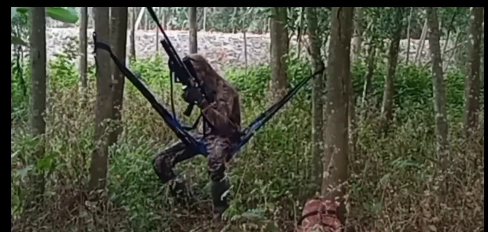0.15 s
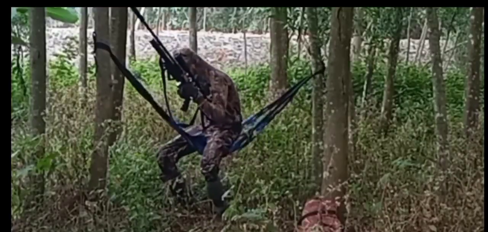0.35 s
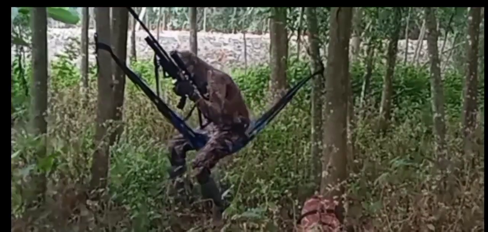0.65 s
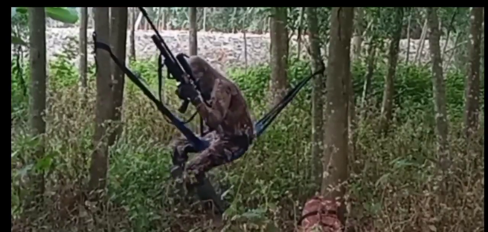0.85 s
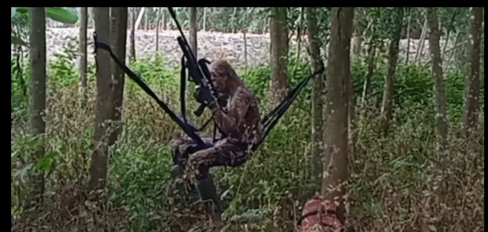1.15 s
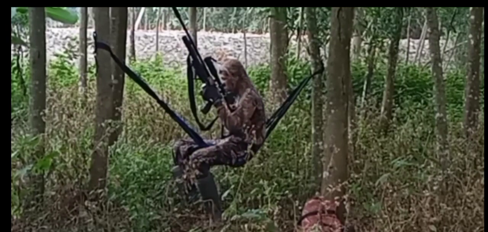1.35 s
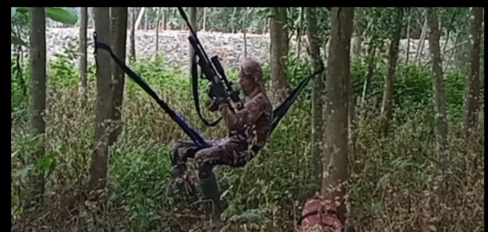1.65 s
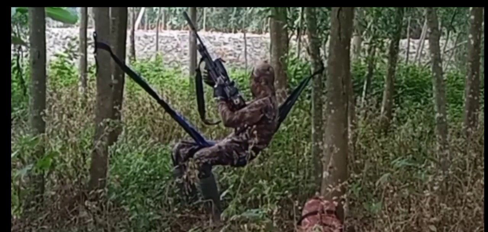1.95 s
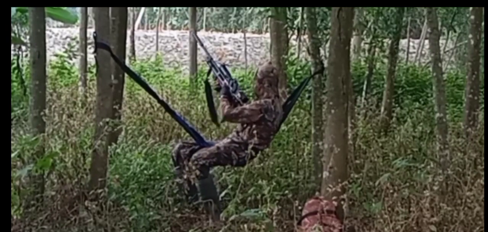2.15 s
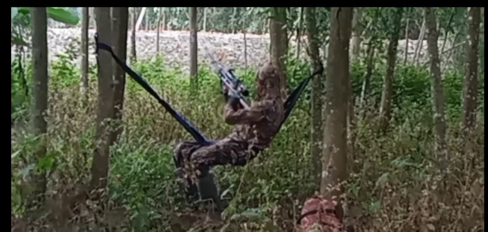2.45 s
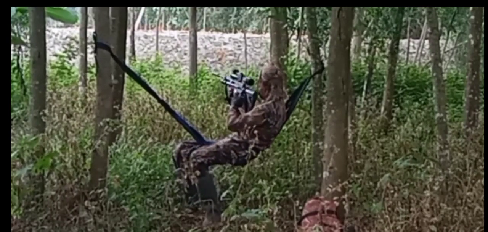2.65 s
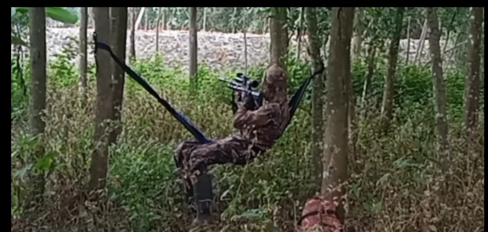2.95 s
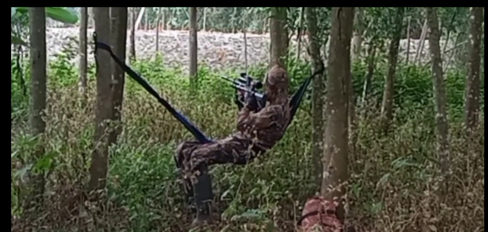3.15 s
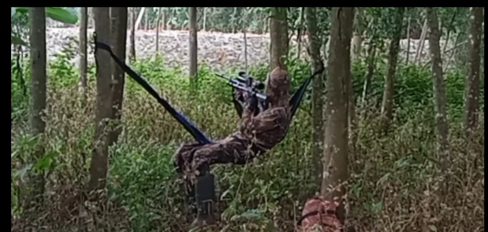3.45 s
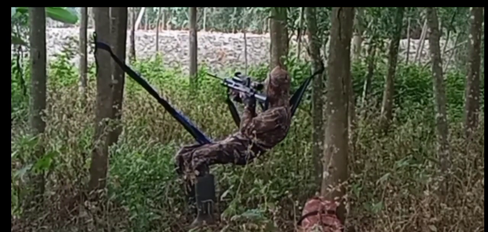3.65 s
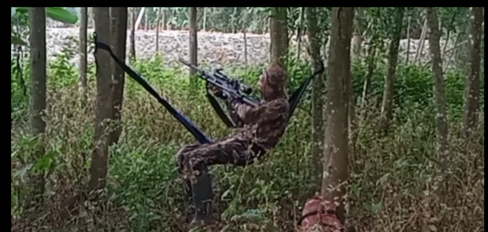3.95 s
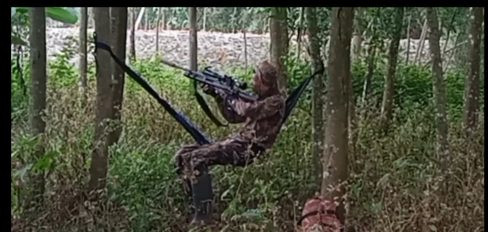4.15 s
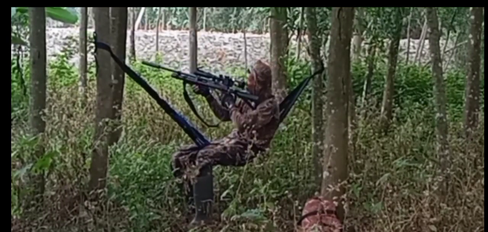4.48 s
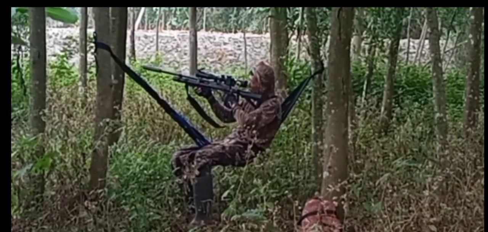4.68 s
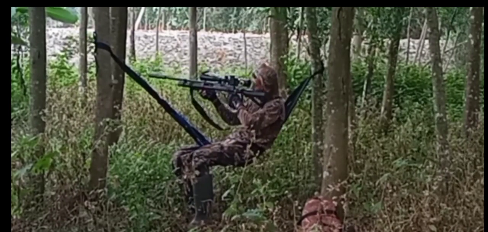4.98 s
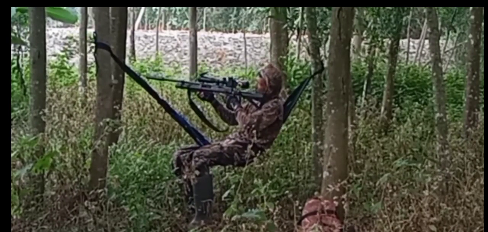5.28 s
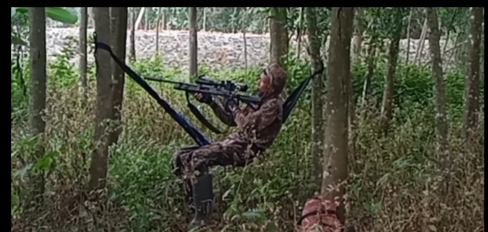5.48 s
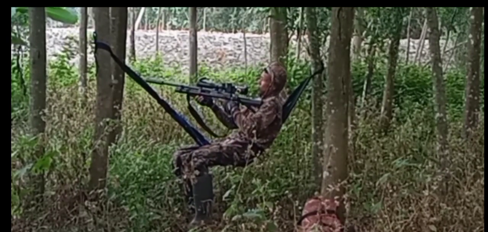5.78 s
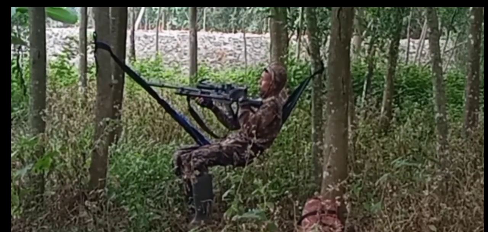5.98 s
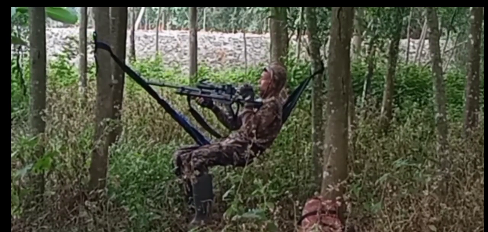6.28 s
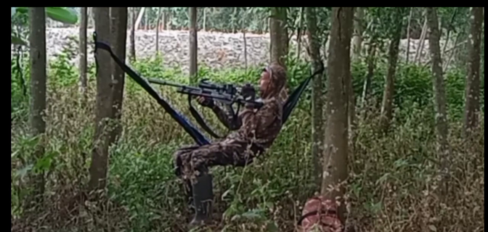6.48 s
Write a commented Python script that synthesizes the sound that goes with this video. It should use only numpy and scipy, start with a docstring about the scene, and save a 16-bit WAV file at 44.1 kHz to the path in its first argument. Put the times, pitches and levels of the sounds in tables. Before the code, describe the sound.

Low trills of quick hoots, each about half a second long, come evenly from a frog-like animal near the microphone and are the loudest sound. Behind them crickets and other insects keep up a high forest drone, with one nearer cricket chirping in runs to the left. Two sharp, falling bird calls ring out a few seconds apart, with faint distant whistles, one slight cloth rustle and soft puffs of air.

```python
"""A low, rolling trill about once a second: a frog-like animal hoots close by in a humid wood.
To the left a cricket scrapes falling chirps with its wings, over a steady chorus of other insects.
A small bird gives two thin, sharp calls, and far birds whistle, heard mostly as echo off the trees.
Air rumbles softly on the microphone, and cloth rustles once."""
import sys
import numpy as np
from scipy import signal
from scipy.fft import rfft, irfft
from scipy.io import wavfile

SR = 44100
rng = np.random.default_rng(int(sys.argv[2]) if len(sys.argv) > 2 else 0)


def wav_record(signal):
    """Record a signal, one row per channel, as 16-bit PCM in the file named by sys.argv[1]."""
    frames = np.transpose(np.atleast_2d(signal))
    bounded = np.clip(frames, -1, 1)
    # unit amplitude maps onto the largest positive 16-bit level
    quanta = np.round(bounded * 32767).astype(np.int16)
    wavfile.write(sys.argv[1], SR, quanta)


N = 291942
TIME = np.arange(N) / SR
FREQS = np.fft.rfftfreq(N, 1 / SR)
LIFT_S = .0052  # how long the push that starts a hoot lifts its pitch


def trill(ring_hz=473.55, arch_hz=13.8, push_s=.005, rasp_s=.0029, stutter_hz=462, mic_lag_s=.00082):
    """The frog-like animal, close by: trains of hoots, raspy where pushed hard, smooth for a stretch."""
    # one trill a row; the middle of its smooth stretch is timed from the first pulse:
    # first_pulse_s, last_pulse_s, level_db, rasp_re_pulse_db, smooth_middle_s, smooth_half_length_s
    trills = [(-.279, 0.154, -18.5, -21, .2, 0.063), (0.628, 1.108, -18.5, -22.5, 0.31, 0.048),
              (1.611, 2.048, -19, -19.5, .27, 0.19), (2.621, 3.057, -19, -18.5, 0.16, 0.035),
              (3.531, 4.01, -18.5, -22, 0.32, 0.046), (4.514, 4.951, -19.5, -20.5, 0.26, 0.18),
              (5.523, 5.96, -18.5, -18.5, 0.15, 0.024), (6.458, 6.897, -19, -21.5, 0.23, 0.083)]
    t = np.arange(-.03, .05, 1 / SR)
    tone, buzz = np.zeros(N), np.zeros(N)
    for first, last, db, rasp_db, smooth_at, smooth_for in trills:
        times = pulse_times(first, last)
        for s, chance in zip(times, rng.standard_normal((len(times), 4))):
            pitch_dev, phase_dev, rasp_dev, damping_dev = chance
            arch = np.sin(np.pi * (s - first) / (last - first)) - .5  # highest in mid-trill
            hz = (ring_hz + arch_hz * arch) * (1 + .012 * pitch_dev)
            if s == times[-1]:  # the spent last pulse
                smooth, gain = 1, amp(db - 2.5)
                swell, phase = hoot(t, hz, lift=.49, push_db=0, push_s=.0097, damped=.39)
            else:
                smooth, gain = np.exp(-((s - first - smooth_at) / smooth_for) ** 8), amp(db)
                early_damping = .24 * bell(s - first - .131, .043)
                damped = min(early_damping + .089 * damping_dev, .5)
                lift = .72 if s in (first, times[-2]) else 1  # opening and closing pushes are flatter
                push_db = .93 * (1 - smooth)
                swell, phase = hoot(t, hz, lift, push_db, push_s, damped)
            phase = phase + np.pi * phase_dev
            add(tone, s + t[0], gain * swell * np.sin(phase))
            # a hard push flattens the wave evenly on both sides: odd harmonics, with a puff of air
            odd_harmonics = np.sin(3 * phase) + amp(-4) * np.sin(5 * phase)
            puff = .44 * rng.standard_normal(len(t))
            rasp = amp(rasp_db - 22 * smooth + 2.5 * rasp_dev) * bell(t, rasp_s)
            ring_buzz = amp(-39) * swell * (1 - bell(t, LIFT_S)) * np.sin(3 * phase)
            add(buzz, s + t[0], gain * (rasp * (odd_harmonics + puff) + ring_buzz))
        for k in range(3):  # a soft stutter swells ahead of the first pulse
            blip = bell(t, .0039) * np.sin(2 * np.pi * (stutter_hz * t + rng.random()))
            add(tone, first - .013 - k * .015 + t[0], amp(-24.5 - 5 * k) * blip)
    tone = band(tone * (1 + .09 * drift(110)), 305, 740)
    buzz = band(buzz, 1150, 3150)
    # the left microphone gets the sound later but louder, most of all its overtones
    left = np.interp(TIME - mic_lag_s / 2, TIME, tone + buzz)
    right = np.interp(TIME + mic_lag_s / 2, TIME, amp(-4) * tone + amp(-9) * buzz)
    buzz_echo = amp(-13) * pan(side_db=8) * trees(buzz, t60=.35, first_s=.006)
    return np.array([left, right]) + amp(-21) * trees(tone, t60=.3) + buzz_echo


def pulse_times(first, last, gap_s=.0383, slow_start_s=.0108, settle_pulses=2.4, last_late_s=.004925):
    """The rhythm of a trill, stretched from first to last: slow, then even, the final pulse late."""
    k = np.arange(round((last - first - slow_start_s - last_late_s) / gap_s) + 1)
    after = k * gap_s + slow_start_s * (1 - np.exp(-k / settle_pulses)) + last_late_s * (k == k[-1])
    return first + after * (last - first) / after[-1]


def hoot(t, ring_hz, lift, push_db, push_s, damped):
    """Swell and phase of one pulse: a short push lifts the pitch, then a lower ring holds, sags, dies."""
    hold_s, release_s, lift_hz, sag_hz_per_s = .017, .022, 86, 2200
    push = bell(t, push_s)
    fade = np.clip((t / (1 - damped) - hold_s) / release_s, 0, 1)
    ring = amp(-2) * (t > 0) * (1 - fade)
    hz = ring_hz + lift * lift_hz * bell(t, LIFT_S) - sag_hz_per_s * np.maximum(t - hold_s, 0)
    return amp(push_db) * push + (1 - push) * ring, 2 * np.pi * np.cumsum(hz) / SR


def cricket(top_hz=5280, bottom_hz=4220, syllable_s=.022, rough_gap_s=.21):
    """A cricket near left: each closing of the wings scrapes a falling syllable, and four make a chirp."""
    # runs of evenly spaced chirps: first_chirp_s, last_chirp_s, level_db
    chirp_runs = [(.093, .271, -49), (.53, .93, -46), (1.177, 2.008, -37.5), (2.249, 3.113, -37.5),
                  (3.348, 3.582, -39.5), (3.843, 4.236, -33.5), (4.463, 4.463, -34), (4.55, 4.75, -35.5),
                  (5.013, 5.212, -39), (5.42, 5.8, -46), (6.307, 6.54, -36)]
    # the wing closings of one chirp: offset_s, level_db
    syllables = [(-.032, -12), (0, -2), (.032, -1.5), (.064, -1)]
    progress = np.arange(0, 1, 1 / (syllable_s * SR))
    fall_hz = top_hz + (bottom_hz - top_hz) * progress ** 1.266
    song = np.zeros(N)
    for first, last, db in chirp_runs:
        for s in np.linspace(first, last, round((last - first) / rough_gap_s) + 1):
            for offset, syllable_db in syllables:
                hz = fall_hz * (1 + .01094 * rng.standard_normal())
                scrape = amp(db + syllable_db) * np.sin(np.pi * progress) * sweep(hz)
                add(song, s + offset - syllable_s / 2, scrape)
    trunk_echo = amp(-8) * np.interp(TIME - .009, TIME, song)
    wood_echo = amp(-5) * trees(song, t60=.45, first_s=.012)
    return pan(side_db=12.5) * (song + trunk_echo + wood_echo)


def near_bird():
    """A small bird on the left, ringing on among the trees; calls from deeper in are faint and echoing."""
    # thin falling calls: start_s, length_s, start_hz, bend (1 = straight), direct_db, echo_db
    calls = [(-.015, 0.06, 7200, 1.2, -42, -41), (0.447, .069, 7860, 2.2, -20.5, -24.5),
             (3.472, .063, 8000, 1.12, -22, -24.5), (4.915, .03, 7300, 0.9, -51, -34),
             (4.948, 0.039, 6850, 1.4, -40, -37.5)]
    song, into_trees = np.zeros(N), np.zeros(N)
    for s, length_s, start_hz, bend, direct_db, echo_db in calls:
        call = thin_call(length_s, start_hz, bend)
        add(song, s, amp(direct_db) * call)
        add(into_trees, s, amp(echo_db) * call)
    leaf_scatter = colour([(5000, 17), (6000, 7.5), (6600, 2.5), (7500, 10.5), (8200, -6)])
    scattered = irfft(rfft(into_trees) * leaf_scatter, N)
    return pan(side_db=14.5) * amp(-7) * (song + trees(scattered, t60=.56, first_s=.005))


def thin_call(length_s, start_hz, bend, end_hz=5055, resonance_hz=6560, flutter_hz=120, flutter_per_s=240):
    """One falling, fluttering call; it lingers, loudest, on the resonance of the bird's throat."""
    # how strongly the throat gives each pitch: pitch_hz, gain_db
    throat = [(5000, -18), (5850, -12.5), (6400, 0), (6700, 0.5), (7050, -9.5), (7450, -5.5), (7780, -16),
              (8200, -20)]
    t = np.arange(0, length_s, 1 / SR)
    fall_hz = start_hz + (end_hz - start_hz) * (t / length_s) ** bend
    off_hz = fall_hz - resonance_hz
    hz = fall_hz - .597 * off_hz * bell(off_hz, 520)  # the resonance pulls the pitch in
    flutter = flutter_hz * np.sin(2 * np.pi * flutter_per_s * t)
    swell = amp(np.interp(hz, *np.transpose(throat))) * signal.windows.tukey(len(t), .1)
    return swell * sweep(hz + flutter)


def chorus(syllables_per_s=32, throb=.15):
    """Many far crickets of one kind blur into a band that throbs at their syllable rate."""
    # the swell of the chorus: time_s, level_db
    levels = [(0, -46), (1.2, -44), (2.5, -46), (3.4, -45.5), (4.3, -44.5), (5.2, -44.5), (5.9, -44),
              (6.62, -43)]
    # its spectrum: frequency_hz, density_db
    spectrum = [(3800, -58), (4150, -27), (4400, -6.5), (4650, -0.5), (5100, -2), (5380, -13), (5700, -28),
                (6100, -64)]
    strokes = sweep(syllables_per_s + 3 * drift(14.3))
    return pan(side_db=6) * amp(curve(levels)) * noise(colour(spectrum)) * (1 + throb * strokes)


def insect_drones():
    """Higher insects buzz on both sides without a pause, each a narrow band beaten by its wing strokes."""
    # one insect a row: pitch_hz, width_hz, level_db, left_over_right_db, strokes_per_s, depth, waver_db
    insects = [(6420, 98, -57.5, 14, 58.6, 0.26, 1), (6233, 130, -63.5, 13, 70, 0.7, -2),
               (7130, 242, -71.5, 13.5, 33, 0.6, 3), (10004, 323, -65.5, -16.5, 98, 0.15, 1.03),
               (15240, 620, -80, 3.5, 110, 0.5, 2)]
    heard = np.zeros((2, N))
    for hz, width_hz, db, side_db, strokes_per_s, depth, waver_db in insects:
        strokes = 1 + depth * sweep(strokes_per_s * (1 + .0092 * drift(1.5)))
        buzz = noise(bell(FREQS - hz, 2 * width_hz))
        heard += pan(side_db) * amp(db + waver_db * drift(19)) * unit(buzz * strokes)
    return heard


def far_birds(waver=.027, faint_count=9, faint_hz=2750, faint_from_s=.7, faint_until_s=3.6):
    """Birds far off in the trees: short, wavering whistles that arrive mostly as echo."""
    # the clearest whistles: start_s, length_s, start_hz, end_hz, level_db
    whistles = [(0.688, 0.12, 3190, 2790, -47.5), (1.03, 0.12, 3086, 2430, -53),
                (1.238, 0.1, 2560, 2945, -57.5), (1.536, 0.036, 2980, 3260, -50.5),
                (1.563, 0.029, 2614, 2436, -47.5), (1.79, 0.11, 3320, 2650, -52.5),
                (2.302, 0.032, 3050, 3250, -49.5), (2.574, .066, 3500, 3070, -55),
                (3.249, 0.083, 3180, 3010, -55.5), (3.385, 0.08, 2650, 2700, -59),
                (4.466, 0.027, 2593, 2507, -46)]
    song, wavering = np.zeros(N), 1 + waver * drift(174)
    faint = []  # fainter ones fall at random between them
    for when, height in rng.random((faint_count, 2)):
        s = faint_from_s + when * (faint_until_s - faint_from_s)
        hz = faint_hz * (1 + .13 * (2 * height - 1))
        faint.append((s, .045, hz, .96 * hz, -59))
    for s, length_s, start_hz, end_hz, db in whistles + faint:
        progress = np.arange(0, 1, 1 / (length_s * SR))
        hz = (start_hz + (end_hz - start_hz) * progress) * wavering[round(s * SR):][:len(progress)]
        add(song, s, amp(db) * np.sin(np.pi * progress) * sweep(hz))
    heard = amp(-10) * song + trees(song, t60=.32, first_s=.002)
    return pan(side_db=7.5) * amp(-1) * heard


def air(hiss_db=-66, lumps_db=3, puff_rise_s=.0069, puff_fade_s=.044):
    """The wood's faint, even hiss, and air on the microphone: a lumpy rumble with sudden puffs."""
    # the still air of the wood: frequency_hz, density_db
    hiss_spectrum = [(30, 7.5), (250, 2.5), (500, 3.5), (900, -4.5), (2000, -3), (3700, -5), (6000, -29),
                     (8300, -12), (11500, -33), (15500, -50)]
    # the rumble on the microphone: time_s, level_db
    rumble_levels = [(0.0, -71), (0.5, -60), (0.88, -71), (1.82, -70.5), (2.56, -63.5), (3.02, -71),
                     (4.54, -55), (4.7, -60.5), (6.34, -68.5), (6.62, -58)]
    # its spectrum: frequency_hz, density_db
    rumble_spectrum = [(12, -21), (20, -66), (53, 1.5), (85, 3.5), (130, 1.5), (199, -18.5), (230, -25),
                       (300, -25.5), (510, -120)]
    # the strongest puffs: start_s, level_db
    puffs = [(0.175, -49), (0.349, -48.5), (0.478, -34), (0.589, -42), (2.079, -48), (2.684, -48),
             (2.929, -50), (3.311, -45.5), (3.699, -45), (4.089, -51), (4.278, -43.5), (4.389, -51),
             (4.739, -41), (4.959, -44.5), (5.489, -38.5)]
    hiss = pan(side_db=5.5) * amp(hiss_db) * noise(colour(hiss_spectrum))
    level = amp(curve(rumble_levels) + 4 + lumps_db * drift(15.4))
    for s, db in puffs:
        after = np.maximum(TIME - s, 0)
        level += amp(db - 5) * np.minimum(after / puff_rise_s, 1) * np.exp(-after / puff_fade_s)
    return hiss + pan(side_db=5) * level * noise(colour(rumble_spectrum))


def cloth_rustle(grain_db=3):
    """One brief, grainy brush of cloth."""
    # the swell of the brush: time_s, level_db
    levels = [(2.42, -90), (2.58, -63), (2.65, -62), (2.74, -90)]
    level = amp(curve(levels) + grain_db * drift(120))
    return level * noise(colour([(1000, -23), (5000, 10), (12000, 1), (16000, -9)]))


def trees(x, t60, first_s=.004):
    """Trunks and leaves scatter a sound into a dying spray of echoes, different in each channel."""
    t = TIME[:SR]
    taps = rng.standard_normal((2, SR)) * (rng.random((2, SR)) < .08)
    taps *= (t > first_s) * 1e-3 ** (t / t60)
    taps /= np.linalg.norm(taps, axis=1, keepdims=True)
    return signal.fftconvolve(x[None], taps, axes=1)[:, :N]


def amp(db):
    """Decibels to gain."""
    return 10 ** (np.asarray(db) / 20)


def unit(x):
    """Scales to rms 1."""
    return x / np.sqrt(np.mean(x ** 2) + 1e-20)


def bell(x, width):
    """A bell curve of height 1 around zero."""
    return np.exp(-(x / width) ** 2)


def curve(rows):
    """A control curve at every sample, from (time_s, value) rows."""
    return np.interp(TIME, *np.transpose(rows))


def colour(points):
    """The gain at every frequency, from (frequency_hz, level_db) points."""
    hz, db = np.transpose(points)
    return amp(np.interp(np.log(FREQS + 1), np.log(hz + 1), db))


def noise(gain):
    """Diffuse noise of a given spectrum, unrelated in the two channels."""
    return unit(irfft(rfft(rng.standard_normal((2, N))) * gain, N))


def drift(per_s):
    """A smooth random curve of rms 1."""
    return unit(irfft(rfft(rng.standard_normal(N)) * bell(FREQS, per_s), N))


def sweep(hz):
    """A sine wave on a frequency curve."""
    return np.sin(2 * np.pi * np.cumsum(hz) / SR)


def band(x, lo_hz, hi_hz):
    """Keeps one band, with steep sides and no delay."""
    return irfft(rfft(x) / np.sqrt((1 + (lo_hz / (FREQS + 1)) ** 10) * (1 + (FREQS / hi_hz) ** 20)), N)


def pan(side_db):
    """Left and right gains, the left louder by side_db."""
    return amp(np.array([[side_db], [-side_db]]) / 2)


def add(mix, s, sound):
    """Mixes a sound in at s seconds."""
    start = round(s * SR)
    sound = sound[max(-start, 0):]
    part = mix[max(start, 0):][:len(sound)]
    part += sound[:len(part)]


def scene():
    """All the voices of the wood as they reach the microphone."""
    animals = trill() + cricket() + chorus() + insect_drones() + near_bird() + far_birds()
    return animals + air() + cloth_rustle()


def record(dry, edge_hz=15750):
    """The recorder's band limit cuts the highest treble."""
    lowpass = signal.firwin(511, edge_hz, window=("kaiser", 9), fs=SR)
    return signal.oaconvolve(dry, lowpass[None], "same")


dry = scene()
out = record(dry)
wav_record(out)
```